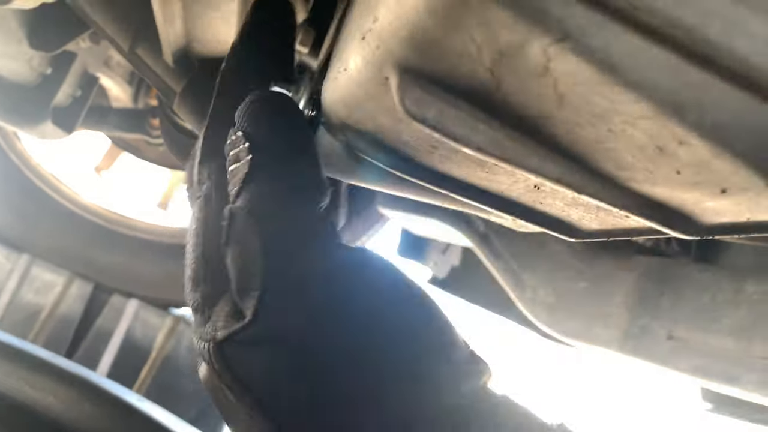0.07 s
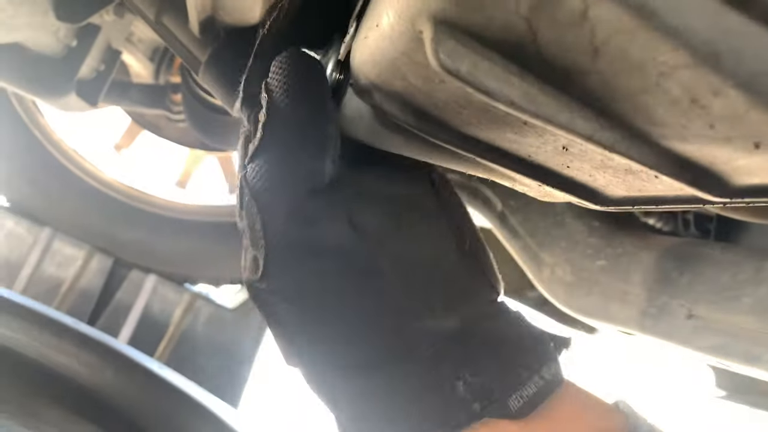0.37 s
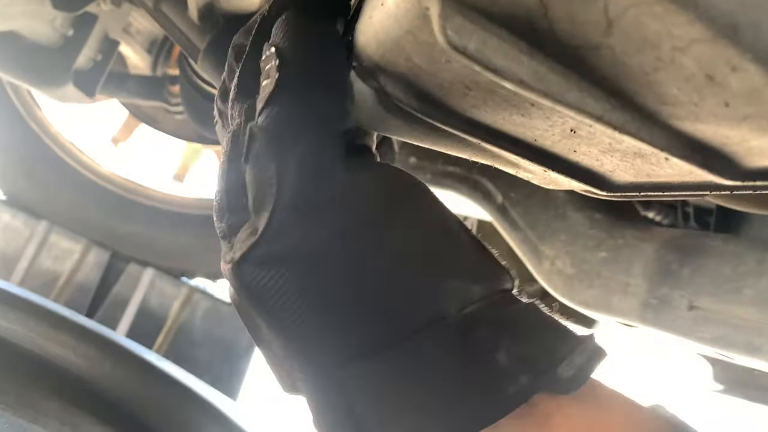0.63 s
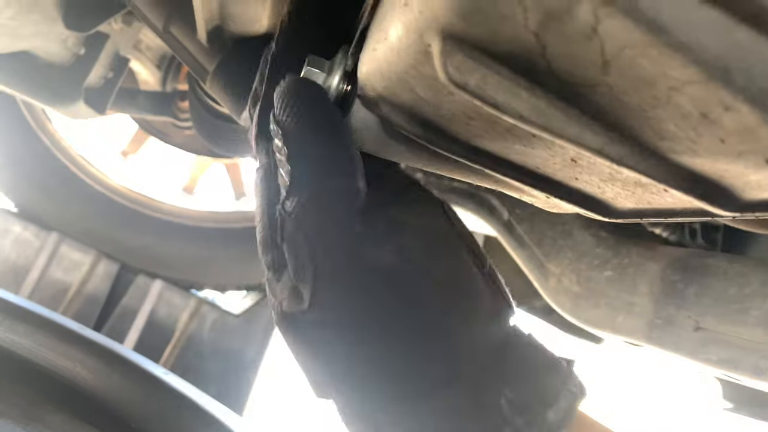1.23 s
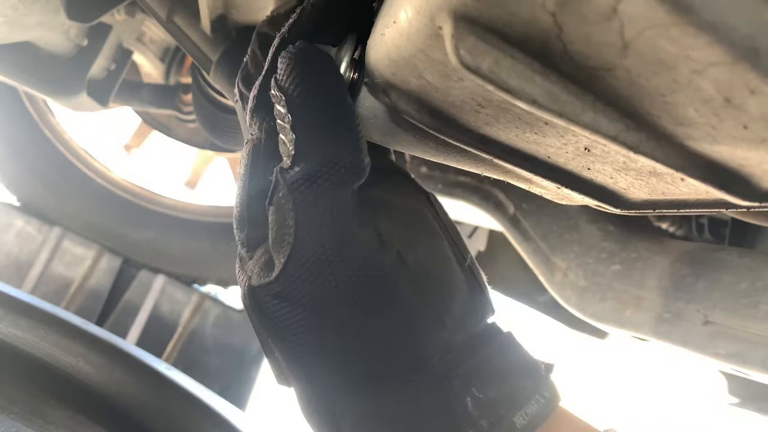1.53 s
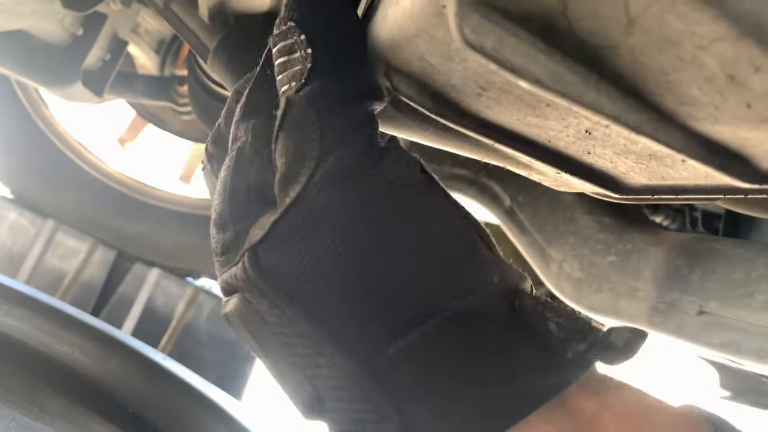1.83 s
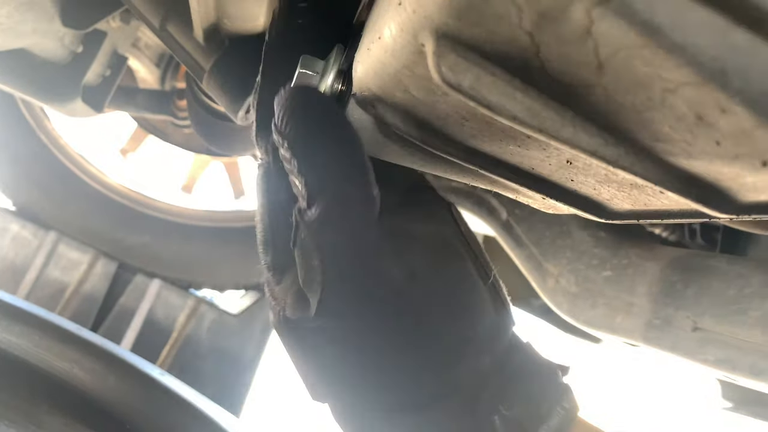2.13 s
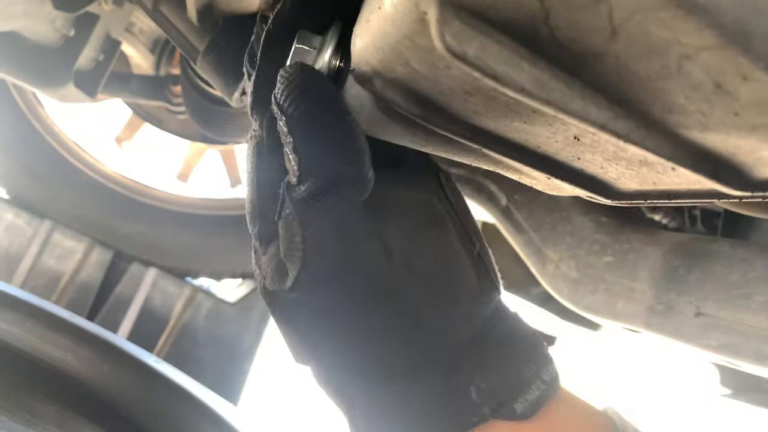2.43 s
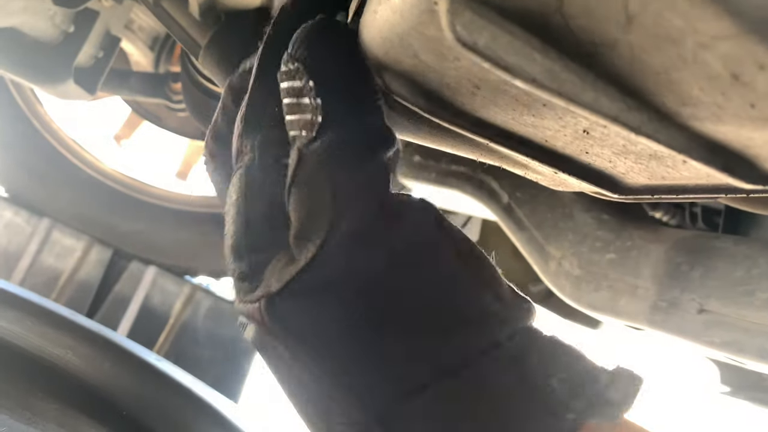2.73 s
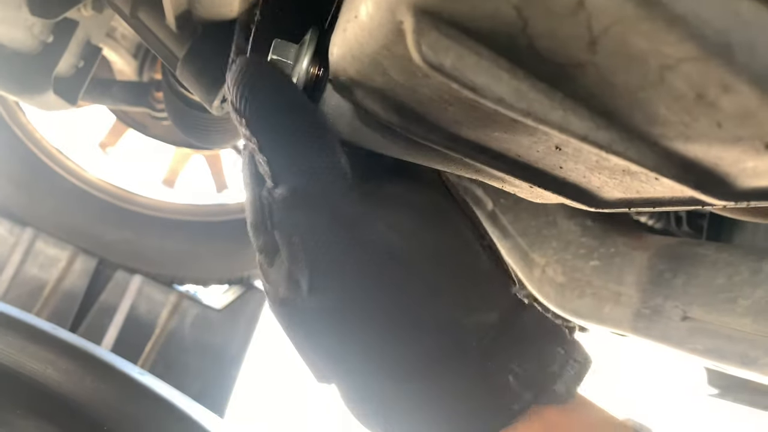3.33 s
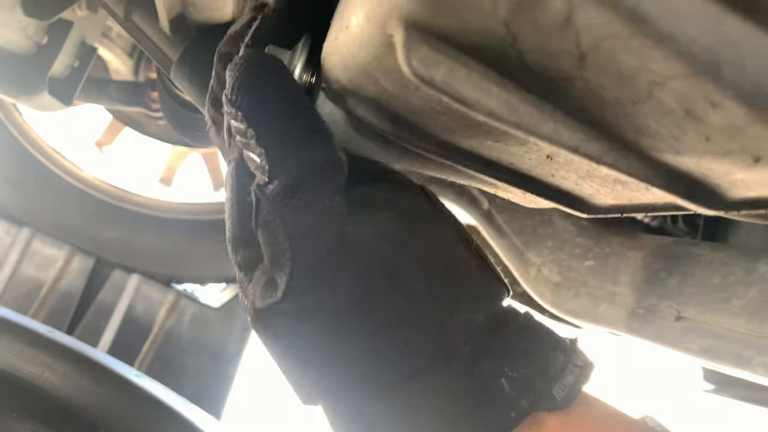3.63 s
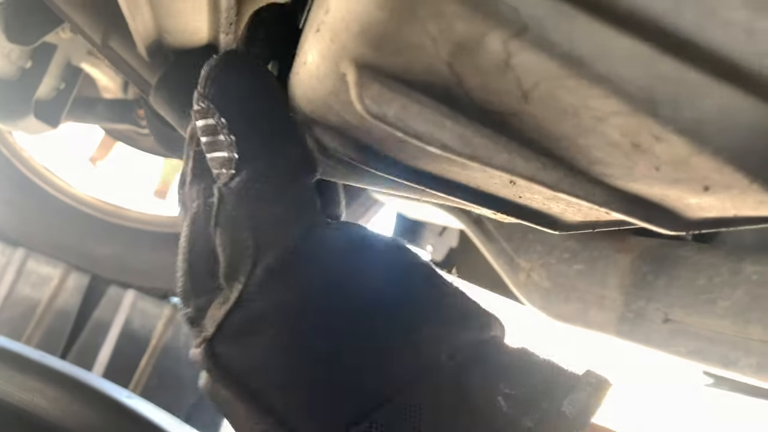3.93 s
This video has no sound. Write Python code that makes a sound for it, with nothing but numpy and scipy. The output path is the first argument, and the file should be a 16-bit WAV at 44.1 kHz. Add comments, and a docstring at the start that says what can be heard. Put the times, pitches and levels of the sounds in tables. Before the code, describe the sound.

A gloved hand rubs softly while spinning a metal bolt, with light clinks over low rumble.

```python
"""First you hear a soft, close hiss and a few clinks: a gloved hand spins a drain bolt under a car.
Each finger stroke is a hiss of tiny fabric slips and rarer snags. The turning thread grates,
the loose bolt knocks, and both make the metal oil pan ring. The glove scrapes and ticks.
A low machine drone and the rumble of the garage lie under it all."""
import sys
import numpy as np
from scipy import signal
from scipy.fft import rfft, irfft, next_fast_len
from scipy.io import wavfile

SR = 44100
rng = np.random.default_rng(int(sys.argv[2]) if len(sys.argv) > 2 else 0)


def master_out(mix):
    """Clip the mix to full scale and print it as 16-bit PCM to the path in sys.argv[1]."""
    frames = np.transpose(np.atleast_2d(mix))
    ceiling = np.clip(frames, -1, 1)
    pcm = np.round(ceiling * 32767).astype(np.int16)
    wavfile.write(sys.argv[1], SR, pcm)


N = 176400
T = np.arange(N) / SR


# Finger strokes: start t/s, length/s, level/dB, extra treble/dB
FINGER_STROKES = [(-.01, 0.19, -59, 1), (0.472, 0.029, -78, 11.5), (0.545, 0.056, -68, -3),
                  (.645, 0.12, -69.5, -0.5), (0.751, 0.078, -62.5, 0.5), (0.883, 0.037, -57, 0),
                  (0.926, 0.28, -70.5, -0.5), (1.119, 0.039, -58.5, 9.5), (1.185, 0.099, -65, -0.5),
                  (1.458, 0.082, -85.5, 13), (1.618, 0.13, -69, -3), (1.684, 0.16, -61.5, -1.5),
                  (2.002, 0.12, -58.5, 7), (2.098, 0.14, -58, 4), (2.226, 0.059, -56, -6.5),
                  (2.332, 0.071, -62.5, -3.5), (2.448, 0.034, -76.5, 8), (2.579, 0.087, -71.5, 3),
                  (2.655, 0.12, -65, 10), (2.764, 0.077, -55.5, 2.5), (2.915, 0.056, -60, 3),
                  (3.008, 0.019, -62, 5.5), (3.096, 0.03, -61, 0), (3.197, 0.061, -59, 1.5),
                  (3.268, 0.069, -61.5, 9.5), (3.382, 0.064, -76.5, 6), (3.491, 0.037, -57.5, 5),
                  (3.639, 0.19, -68.5, -1.5), (3.767, 0.08, -61.5, 1.5), (3.874, 0.13, -59.5, -2)]
# Tone colour of the rubbing fabric: f/Hz, relative level/dB
FABRIC_COLOUR = [(200, -8), (800, -4), (1600, 0), (2800, 0.5), (3500, -1.5), (4400, 0), (5600, -4.5),
                 (7000, 2.5), (8700, -1.5), (10500, 1.5), (13000, -5.5), (16000, -3.5)]
def glove(attack_s=0.021, release_s=0.019, treble_hz=6760, resting_db=-80, ring_db=-31):
    """Fabric slips and snags in a hiss that swells with each stroke and faintly rings the pan."""
    force = slips(per_s=9000, spread_db=2.5) + amp(-6.5) * slips(per_s=400, spread_db=1)
    hiss = shifting_contact(colour(force, FABRIC_COLOUR))
    hiss *= amp(0.77 * drift(hz=59.6))  # a slight, fast flutter
    treble = cut_lows(hiss, treble_hz, steepness=6)
    low_power = treble_power = amp(resting_db) ** 2
    for start, length, db, extra_db in FINGER_STROKES:
        rise = (1 + np.tanh((T - start) / attack_s)) / 2
        fall = (1 - np.tanh((T - start - length) / release_s)) / 2
        low_power += (rise * fall * amp(db)) ** 2
        treble_power += (rise * fall * amp(db + extra_db)) ** 2
    rub = (hiss - treble) * np.sqrt(low_power)
    return rub + amp(ring_db) * rub.std() * pan_ring(rub) + treble * np.sqrt(treble_power)


def shifting_contact(x, depth_db=3, width_hz=270, lasting_s=0.016):
    """The spot where the glove touches keeps changing, so pitches briefly stand out and fade."""
    hz, t, spectrum = signal.stft(x, SR, nperseg=512)
    bumps = rng.standard_normal(spectrum.shape[::-1]).T
    # Smooth the random bumps across pitch, then across time.
    for axis, steps in enumerate([width_hz / hz[1], lasting_s / t[1]]):
        keep = np.exp(-1 / steps)
        bumps = signal.lfilter([1 - keep], [1, -keep], bumps, axis=axis)
    _, shifted = signal.istft(spectrum * amp(depth_db * unit(bumps)), SR, nperseg=512)
    return unit(shifted[:N])


# How hard the thread grates: t/s, level/dB before boost_db is added
GRATING_LEVELS = [(0.0, -75), (0.11, -95), (0.15, -89), (0.19, -73), (0.28, -87), (.5, -85.5), (1.0, -72.5),
                  (1.14, -74.5), (1.4, -89.5), (1.82, -71.5), (1.9, -78), (2.17, -75), (2.57, -85),
                  (2.82, -72), (2.87, -75.5), (3.04, -68.5), (3.63, -83.5), (3.84, -68), (3.92, -76.5),
                  (4.0, -62.5)]
# Tone colour of the dull part of the grating: f/Hz, relative level/dB
GRATING_COLOUR = [(200, 10.5), (600, -5), (1000, -4.5), (1300, -1), (1650, 5), (2100, 5), (3000, -10),
                  (4500, -8.5), (7000, -16), (16000, -24)]
def thread(boost_db=5, ring_db=-8):
    """The turning screw thread grates in tiny catches and sets the pan ringing faintly."""
    level = amp(np.interp(T, *np.transpose(GRATING_LEVELS)) + boost_db)
    force = slips(per_s=2200, spread_db=2.5) * level
    dull = unit(colour(force, GRATING_COLOUR))
    return force.std() * unit(dull + amp(ring_db) * pan_ring(force))


# Scrapes and squeaks: start t/s, length/s, level/dB, centre f/Hz, width/octaves
SCRAPE_EVENTS = [(0.142, 0.03, -57.5, 10500, 0.7), (0.145, 0.022, -55.5, 1840, 0.1),
                 (0.781, 0.03, -67.5, 2850, 0.058), (0.822, 0.06, -58.5, 366, 0.096),
                 (0.905, 0.19, -72.5, 2210, 0.19), (1.213, 0.02, -63.5, 3270, 0.051),
                 (1.667, 0.11, -71.5, 3480, 0.22), (2.04, 0.28, -65.5, 2550, 1),
                 (2.173, 0.037, -58.5, 2870, 0.18), (2.586, 0.043, -64, 1010, 0.1),
                 (2.779, 0.026, -61.5, 2370, 0.55), (3.013, 0.021, -57, 1850, 0.27),
                 (2.95, 0.55, -69, 947, 0.15), (3.253, .1, -67.5, 4860, 0.44),
                 (3.788, 0.09, -59, 1634, 0.034), (3.88, 0.14, -70, 4200, 0.064)]
def scrapes(ring_db=-24):
    """Glove and bolt catch in bursts of slips; a narrow band squeaks, a wide one scrapes."""
    force = np.zeros(N)
    for start, length, db, hz, octaves in SCRAPE_EVENTS:
        grit = unit(keep_band(slips(per_s=2200, spread_db=2.5), hz, octaves))
        swell = np.sin(np.pi * np.clip((T - start) / length, 0, 1))
        force += amp(db) * grit * swell
    return force.std() * unit(unit(force) + amp(ring_db) * pan_ring(force))


# Knocks of the loose bolt: t/s, level/dB before filtering, centre f/Hz
BOLT_KNOCKS = [(.1475, -36, 2700), (.154, -41, 2500), (.163, -49, 4000), (1.2325, -48, 2300),
               (1.831, -51, 3100), (2.454, -60, 4200), (3.02, -50, 2200), (3.075, -55, 1800),
               (3.4015, -51, 2400), (3.589, -62, 2800), (3.971, -51, 4000)]
def knocks(ring_db=-3):
    """The bolt rocks in its hole, making dull clinks that ring the pan."""
    force = np.zeros(N)
    for start, db, hz in BOLT_KNOCKS:
        force += amp(db) * keep_band(burst(start, decay_s=0.002), hz, octaves=0.6)
    return force + amp(ring_db) * force.std() * pan_ring(force)


# Ticks of the glove: t/s, level/dB before filtering, lowest f/Hz
GLOVE_TICKS = [(.8075, -42, 5500), (1.8108, -35.5, 2500), (1.9005, -54, 8500), (1.9919, -53, 7000),
               (2.453, -55, 4000), (2.696, -42, 10000), (2.927, -43, 3900), (3.529, -43, 9000)]
# Tone colour of a tick: f/Hz, relative level/dB
TICK_COLOUR = [(2000, -4), (3000, -3), (6000, -5), (8500, 3), (11000, 1), (16000, -2)]
def ticks(crack_db=5):
    """The glove snaps off the bolt head: one sharp crack, then about a millisecond of crackle."""
    snaps = np.zeros(N)
    for start, db, lowest_hz in GLOVE_TICKS:
        snap = burst(start, decay_s=0.0007)
        snap[round(start * SR)] = amp(crack_db)
        snaps += amp(db) * cut_lows(snap, lowest_hz, steepness=8)
    return colour(snaps, TICK_COLOUR)


# The pan's own notes: f/Hz, relative level/dB, time to fade by 60 dB/s
PAN_NOTES = [(1667, 2, .04), (1885, 0, .03), (2065, -5, .025), (2584, -6, .025), (2888, -6, .025),
             (3220, -6, .028), (3380, -7, .028), (3990, -9, .028), (4240, -7, .022), (4517, -9, .025),
             (6820, -12, .02)]
def pan_ring(force):
    """Every push on the metal pan starts all its notes, which quickly die away."""
    t = T[:SR // 4]
    notes = sum(amp(db - 60 * t / fade_s) * np.sin(2 * np.pi * hz * t) for hz, db, fade_s in PAN_NOTES)
    return unit(signal.fftconvolve(force, notes)[:N])


# Tone colour of the echoes off the car's underside and the floor: f/Hz, relative level/dB
ECHO_COLOUR = [(300, 5), (2000, 1.5), (3800, 4.5), (5500, 0.5), (8000, -26), (16000, -4)]
def under_car(x, echo_db, echo_count, fade_s=0.061, right_delay_s=0.0001818):
    """Sound arrives on the left first, then bounces back by paths that change as the hand moves."""
    t = T[:SR // 4]
    right = shape(x, lambda f: np.exp(-2j * np.pi * f * right_delay_s))
    echo = np.zeros((2, N))
    for k in range(echo_count):
        tail = rng.standard_normal((2, len(t))) * amp(-60 * t / fade_s) * (t > 0.001)
        tail = colour(tail / np.linalg.norm(tail, axis=1, keepdims=True), ECHO_COLOUR)
        # Each echo hands over smoothly to the next.
        share = np.cos(np.pi / 2 * np.clip(T / T[-1] * (echo_count - 1) - k, -1, 1))
        echo += signal.oaconvolve((x * share)[None], tail, axes=1)[:, :N]
    return (np.array([x, right]) + amp(echo_db) * echo) / np.sqrt(1 + amp(echo_db) ** 2 / 2)


# Rise and fall of the machine's tone: t/s, level/dB before tone_db and lean_db are applied
DRONE_LEVELS = [(0, -43), (.13, -49.5), (.22, -39.5), (.7, -43.5), (1.3, -45), (1.52, -55), (1.7, -41.5),
                (1.9, -58.5), (2.25, -40.5), (2.5, -71), (3.1, -58.5), (3.55, -44.5), (3.73, -34.5),
                (3.86, -35.5), (4, -42.5)]
def machine_drone(hz=72.9, width_hz=21, wander_hz=2.14, throb_db=-48, tone_db=-1, lean_db=2):
    """A wavering low tone swells and sinks over a steady throb, louder on the left."""
    throb = unit(shape(rng.standard_normal(N), lambda f: 1 / (1 + ((f - hz) / width_hz) ** 4)))
    pitch_hz = hz + wander_hz * drift(hz=3.88)
    tone = unit(np.sin(2 * np.pi * np.cumsum(pitch_hz) / SR))
    level = amp(np.interp(T, *np.transpose(DRONE_LEVELS)) + tone_db)
    return (amp(throb_db) * throb + level * tone) * amp([[lean_db], [-lean_db]])


# Tone colour of the garage rumble: f/Hz, relative level/dB
RUMBLE_COLOUR = [(15, -25), (29, -24), (39, 2), (52, -1.5), (95, 1), (115, -3), (150, -5.5), (240, -9),
                 (310, -18), (400, -19), (520, -25.5), (700, -27.5), (1000, -28.5), (1300, -37.5),
                 (2000, -50.5), (3200, -67), (8000, -66.5), (16000, -54.5)]
# How alike left and right are: f/Hz, likeness (0 = unrelated, 1 = the same)
SIDE_LIKENESS = [(30, 0.98), (120, 0.77), (250, 0.77), (500, 0.26), (1000, 0), (16000, 0)]
def garage_rumble(level_db=-44.5, flutter_db=0.6):
    """Rumble comes from all around, so the two sides are alike only in the bass."""
    left, other = rng.standard_normal((2, N))
    likeness = lambda f: look_up(SIDE_LIKENESS, f)
    right = shape(left, likeness) + shape(other, lambda f: np.sqrt(1 - likeness(f) ** 2))
    rumble = unit(colour(np.array([left, right]), RUMBLE_COLOUR))
    return amp(level_db + flutter_db * drift(hz=38)) * rumble


def slips(per_s, spread_db):
    """Rubbing surfaces stick and let go: a random stream of tiny clicks of uneven size."""
    size = amp(spread_db * np.minimum(rng.exponential(1, N), 5))
    return unit(size * rng.choice([-1, 1], N) * (rng.random(N) < per_s / SR))


def burst(start, decay_s):
    """A noisy hit that starts at once and dies quickly."""
    fade = np.exp(-np.maximum(T - start, 0) / decay_s) * (T >= start)
    return fade * rng.choice([-1, 1], N)


def drift(hz):
    """A smooth random wobble, up to about hz swings a second."""
    return unit(shape(rng.standard_normal(N), lambda f: 1 / (1 + (f / hz) ** 4)))


def amp(db):
    """Turns decibels into a number to multiply by."""
    return 10 ** (np.asarray(db) / 20)


def unit(x):
    """Scales a sound so its average strength (rms) is 1."""
    return x / np.sqrt(np.mean(x ** 2) + 1e-20)


def look_up(table, hz):
    """Reads between the rows of a frequency table, giving each octave equal room."""
    f, value = np.transpose(table)
    return np.interp(np.log(hz + 1), np.log(f), value)


def shape(x, gain):
    """Multiplies each frequency f in a sound by gain(f)."""
    size = next_fast_len(x.shape[-1] + SR // 2)
    spectrum = rfft(x, size) * gain(np.fft.rfftfreq(size, 1 / SR))
    return irfft(spectrum, size)[..., :x.shape[-1]]


def colour(x, table):
    """Turns frequencies up or down as a tone colour table says."""
    return shape(x, lambda f: amp(look_up(table, f)))


def keep_band(x, hz, octaves):
    """Keeps only the frequencies around one pitch."""
    return shape(x, lambda f: 1 / np.sqrt(1 + (np.log2((f + 1) / hz) / octaves) ** 6))


def cut_lows(x, hz, steepness):
    """Fades out the frequencies below hz."""
    return shape(x, lambda f: 1 - 1 / (1 + (f / hz) ** steepness))


def scene():
    """Glove, bolt and pan echo under the car, over the drone and the rumble."""
    ticking = under_car(ticks(), echo_db=-9, echo_count=2)
    knocking = under_car(knocks(), echo_db=-3, echo_count=2)
    rubbing = under_car(glove(), echo_db=-1, echo_count=12)
    grating = under_car(thread() + scrapes(), echo_db=-1, echo_count=12)
    return rubbing + grating + knocking + ticking + machine_drone() + garage_rumble()


def record(dry, lowest_hz=36, highest_hz=15850):
    """Trims away the deepest bass and the highest treble."""
    trimmed = cut_lows(dry, lowest_hz, steepness=10)
    treble_cut = signal.firwin(511, highest_hz, window=("kaiser", 9), fs=SR)
    return signal.oaconvolve(trimmed, treble_cut[None], "same")


dry = scene()
out = record(dry)
master_out(out)
```